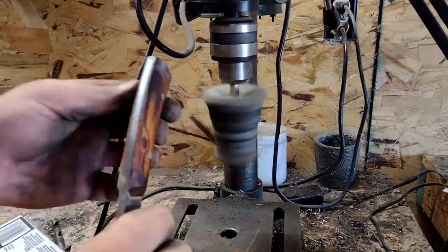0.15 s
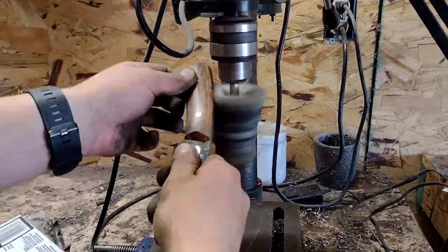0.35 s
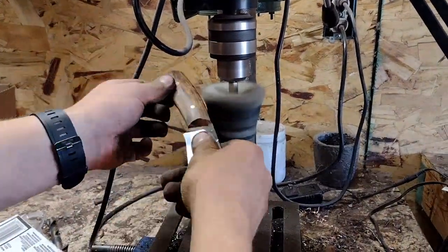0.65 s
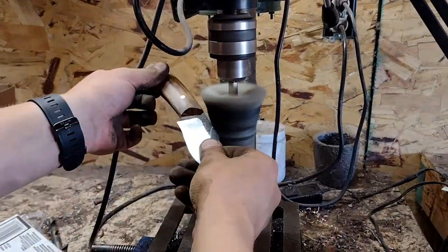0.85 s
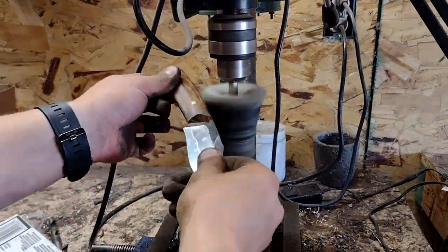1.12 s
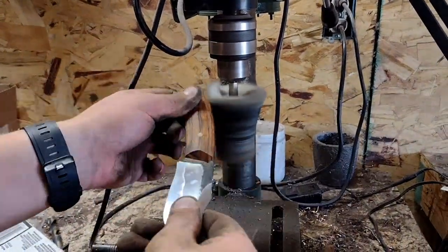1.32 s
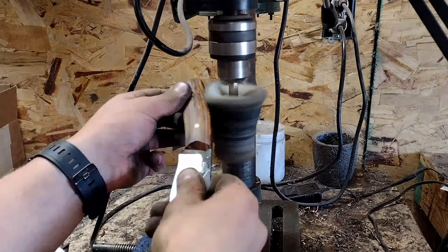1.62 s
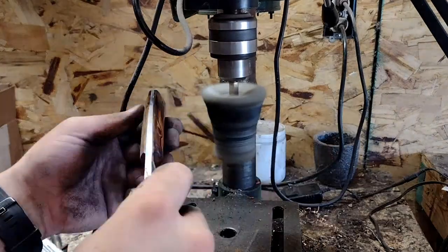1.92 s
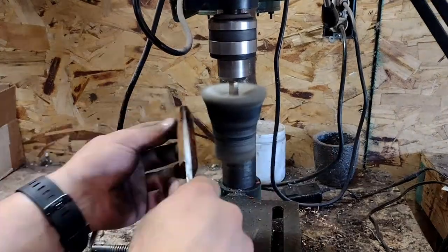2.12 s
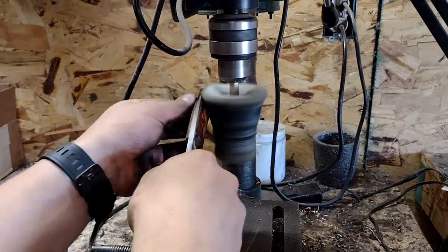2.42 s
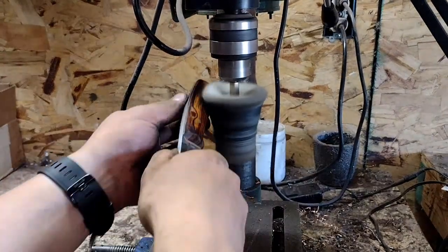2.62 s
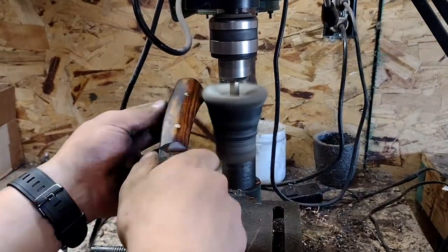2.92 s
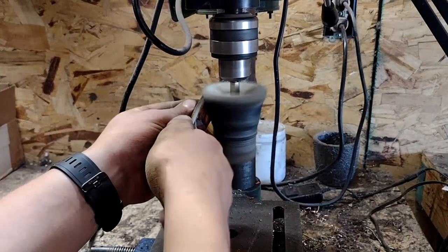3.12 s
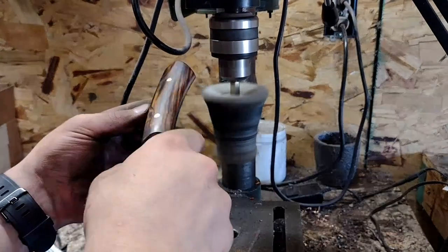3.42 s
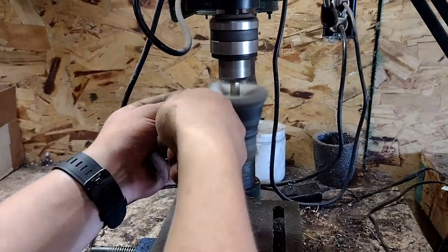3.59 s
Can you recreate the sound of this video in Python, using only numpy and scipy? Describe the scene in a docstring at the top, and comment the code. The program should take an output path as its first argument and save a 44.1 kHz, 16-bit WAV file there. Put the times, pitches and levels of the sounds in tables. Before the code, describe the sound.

A drill press spins a cloth buffing wheel with a steady low drone, whir, light rattle and scattered metallic knocks. A knife handle rasps against it from 0.13 to 0.3 seconds, then longer from 0.66, biting with a loud hiss and scratch near 1.05. Shorter fluttering strokes follow from 1.2, with tiny faint squeaks near 2.45 and 2.78. Close, small wooden workshop; abrupt silence at 3.7.

```python
"""A motor drone and a light metallic rattle come first: a drill press spins a cloth buffing wheel in a small
wooden workshop. Then a knife handle is pressed to the wheel in short strokes, rasping with a flutter, hissing
when it bites, scratching at times and twice squeaking briefly; all sound stops abruptly at the end.
Drone: filtered noise. Rattle and knocks: impacts ringing resonances. Strokes and scratches: random grains.
Squeaks: trains of stick-slip pulses."""
import sys
import numpy as np
from scipy import signal
from scipy.fft import rfft, irfft, next_fast_len
from scipy.io import wavfile
from scipy.ndimage import map_coordinates

SR = 44100
rng = np.random.default_rng(int(sys.argv[2]) if len(sys.argv) > 2 else 0)


def waveform_to_disk(signal):
    """Save audio, clipped to [-1, 1], as 16-bit WAV at the path in sys.argv[1]."""
    frames = np.transpose(np.atleast_2d(signal))
    scaled = np.clip(frames, -1, 1) * 32767
    samples = np.round(scaled).astype(np.int16)
    wavfile.write(sys.argv[1], SR, samples)


N = 165375  # samples

WHEEL_HZ = 42.98  # turns per second

# Spectrum of the rumble through the frame [f/Hz, level/dB]
FRAME_SPECTRUM = [(15, -40.5), (25, -15), (49, -3.5), (91, -6.5), (127, 0), (173, -4), (217, -3.5),
                  (285, -6), (343, -5.5), (424, 1), (558, -3), (620, -13), (690, -4.5), (768, -12.5),
                  (894, -18), (950, -25.5), (1240, -25.5), (2090, -120)]
# Resonances of the motor's hum [f/Hz, width/Hz, level/dB]
HUM_MODES = [(128.5, 13.55, -1.5), (226, 20, -12.5), (685, 19, -12)]
# Spectrum of the bearings' whir [f/Hz, level/dB]
WHIR_SPECTRUM = [(500, -41.5), (900, -11), (1060, 2.5), (1290, -8.5), (1540, 3), (1900, -5.5), (2250, -7),
                 (2630, -14.5), (3000, -19.5), (3800, -33.5), (4300, -27), (5000, -29.5), (8500, -37.5),
                 (15500, -54)]
FRAME_DB, HUM_DB, WHIR_DB = -53, -63, -61  # rms before the common waver

# Resonances of spindle and chuck [f/Hz, width/Hz, level/dB]
SPINDLE_MODES = [(1050, 80, -13), (1560, 190, -1), (1850, 230, 0), (2300, 300, -10), (3150, 250, -22),
                 (4280, 200, -18), (6400, 400, -28), (8600, 600, -34)]
# Spectrum of the rattle's soft contact [f/Hz, level/dB]
SOFT_CONTACT_SPECTRUM = [(2000, -1), (4300, -5), (7000, -14)]
RATTLE_DB, RATTLE_PER_S = -69, 160  # direct rms, impacts per second
# Sharp knocks of the spindle [t/s, level/dB before KNOCK_GAIN_DB]
KNOCKS = [(0.2682, -34), (0.717, -44), (0.8292, -29), (0.913, -35.5), (0.9363, -34), (0.9722, -31.5),
          (1.0114, -32), (1.1526, -37.5), (1.1847, -38.5), (1.2086, -41), (1.362, -35), (1.8237, -43),
          (1.879, -40), (1.9888, -40.5), (2.0157, -39), (2.2674, -38), (2.3141, -42), (2.6258, -40.5),
          (2.797, -38), (2.8257, -40.5), (2.9806, -45), (3.0152, -39), (3.2569, -40), (3.5385, -40.5),
          (3.68, -41.5)]
KNOCK_GAIN_DB, BURR_DECAY_S = 10, 0.0027
# Spells of thin metallic chatter [start t/s, end t/s, level/dB]
CHATTER_SPELLS = [(.22, 0.336, -81), (2.136, 2.362, -73.5), (2.776, 2.856, -77), (2.912, 3.06, -72.5)]
# Spectrum of the chatter [f/Hz, level/dB]
CHATTER_SPECTRUM = [(3300, -45), (3950, -17), (4180, -2), (4380, 0), (4580, -14), (5200, -45)]
CHATTER_DEPTH_DB = 5.5  # peak swing over a turn

# Strokes against the wheel, each a list of [t/s, rasp level/dB, hiss level/dB], before the trims below
STROKES = [
    [(0.13, -67, -99), (0.132, -61, -96), (0.208, -46, -62.5), (0.274, -45.5, -73.5), (0.286, -65, -84),
     (0.3, -50.5, -81)],
    [(0.66, -76, -101), (0.674, -59, -84), (0.782, -44.5, -59), (1.05, -41.5, -52.5), (1.07, -36, -46),
     (1.14, -49.5, -66)],
    [(1.23, -56, -79), (1.356, -53.5, -74.5), (1.362, -54.5, -68), (1.4, -56, -81), (1.452, -47.5, -63.5),
     (1.68, -60.5, -86)],
    [(1.885, -49, -74), (2.057, -44, -68), (2.107, -47, -68.5), (2.143, -46, -66), (2.167, -54, -76),
     (2.21, -51.5, -75)],
    [(2.24, -67, -80), (2.272, -53.5, -79), (2.304, -58, -80), (2.316, -49, -68), (2.37, -61.5, -87),
     (2.38, -72, -79)],
    [(2.51, -78, -95), (2.52, -58, -86), (2.578, -49, -67), (2.596, -65, -81), (2.604, -66, -80),
     (2.61, -76, -79)],
    [(2.71, -66, -91.5), (2.758, -52, -75), (2.788, -50, -58.5), (2.802, -43, -62.5), (2.816, -67, -87.5),
     (2.82, -68, -79)],
    [(2.89, -54, -83), (2.908, -78, -88), (2.922, -53, -81), (2.938, -49, -68.5), (2.994, -64, -87),
     (3.0, -63, -85)],
    [(3.16, -59, -117), (3.2, -57.5, -85), (3.21, -58, -75), (3.218, -53, -69.5), (3.23, -45, -76),
     (3.25, -71, -85)],
    [(3.3, -59.5, -87), (3.368, -49.5, -67), (3.47, -50, -65), (3.482, -41.5, -58), (3.506, -56.5, -84),
     (3.52, -58, -91)],
    [(3.675, -71, -90), (3.679, -56, -76), (3.695, -50.5, -79), (3.708, -53, -76)],
]
# Ringing of the handle in each stroke [level/dB over the rasp]
HANDLE_RING_DB = [-3, -10.5, -9, 3.5, -15, -4, -7.5, -6.5, -2, -3.5, -16]
# Resonances of the handle [f/Hz, width/Hz, level/dB]
HANDLE_MODES = [(1398, 95, 4.5), (1890, 160, 1), (2610, 27, -15.5), (3036, 41, -13), (3370, 90, -11.5),
                (4760, 80, -37), (6200, 110, -42), (6530, 110, -28.5)]
# Spectrum of the rasp [f/Hz, level/dB]
RASP_SPECTRUM = [(470, -41), (800, -11.5), (857, -11), (940, -15), (1030, 5), (1310, -8.5), (1440, 5),
                 (1620, -0.5), (1860, -3.5), (2050, -5), (2630, -8), (2830, -15), (3180, -11), (3490, -16),
                 (3790, -27.5), (4220, -17), (4420, -25), (4740, -28), (5000, -40), (6500, -45.5),
                 (11000, -120)]
# Spectrum of the hiss [f/Hz, level/dB]
HISS_SPECTRUM = [(2820, -49), (4800, -14), (4910, -25), (5070, -19), (5540, -5), (6340, 2.5), (6770, -5),
                 (6950, -8.5), (7320, -8), (8110, -2.5), (8630, -3), (9180, -7), (9610, -14),
                 (10500, -14.5), (13600, -47), (22000, -120)]
# Spectrum of the top sizzle [f/Hz, level/dB]
SIZZLE_SPECTRUM = [(5000, -32), (9500, -13), (11200, 0), (12100, 0), (13300, 3), (15600, -5.5)]
# Spectrum of the low thrum as a stroke loads the frame [f/Hz, level/dB]
THRUM_SPECTRUM = [(60, -18.5), (130, -3), (250, -3.5), (400, -6), (540, 2.5), (620, -10), (700, -16),
                  (900, -4.5), (1300, -46)]
RASP_TRIM_DB, HISS_TRIM_DB, THRUM_TRIM_DB = -2, -2.5, -10.5
# Sizzle level when the hiss curve is at FULL_BITE_DB, and the power of the hiss it follows
SIZZLE_DB, FULL_BITE_DB, SIZZLE_EXPONENT = -69.5, -57, 0.96
FLUTTER_DB = 2  # peak swing over a turn
FIBRES_PER_S, GRIT_PER_S = 5000, 2800  # mean impacts per second

# Scratches where an edge catches the wheel [t/s, length/s, peak level/dB]
SCRATCHES = [(1.028, .085, -43), (2.33, 0.014, -60), (2.57, 0.024, -72), (2.801, .016, -66),
             (3.212, 0.017, -65), (3.466, .03, -62)]
# Spectrum of the scratches [f/Hz, level/dB]
SCRATCH_SPECTRUM = [(500, -17), (2000, 9), (5500, 1.5), (8500, -7.5), (11000, -6.5), (14500, -3),
                    (16000, 8)]

# Squeaks [t/s, length/s, slip rate f/Hz, level/dB]
SQUEAKS = [(2.451, 0.014, 1010, -65), (2.783, 0.014, 990, -68)]
# Spectrum of a slip [f/Hz, level/dB]
SQUEAK_SPECTRUM = [(1000, -12), (2800, -10), (4200, -10), (5100, -14), (6000, -5), (7000, -1), (8000, -5),
                   (9200, -4), (10100, 1), (11200, -12), (13200, -11), (16000, -15)]

# Time for the late answer to fall 60 dB [f/Hz, time/s]; where negative, it grows instead
DECAY_TIME = [(200, .2), (2000, 1.4), (12000, -0.5)]
# Reflected or side-specific share [f/Hz, level/dB over the direct or shared part]
WET_SHARE = [(60, -20), (150, -18), (320, -14), (550, -4.5), (1200, -1), (3000, 1), (9000, 3)]
# Left side over right [f/Hz, level/dB]
BALANCE = [(60, -0.5), (250, 1.5), (480, 1), (600, 1), (700, 6.5), (850, 6), (1150, -4), (1500, 1),
           (1900, -1), (2350, 4), (2800, -1), (4150, -1), (5400, 0.5), (5850, 1), (7000, 2), (9500, 1),
           (15000, 1)]
STOP_S, STOP_FADE_S = 3.711, 0.0026  # moment of silence, and the fade before it
TOP_HZ = 15750  # band limit


def amp(db):
    """Decibels to amplitude ratio."""
    return 10 ** (np.asarray(db) / 20)


def unit(x):
    """Scaling to rms 1."""
    return x / np.sqrt(np.mean(x ** 2) + 1e-20)


def clock():
    """The time of each sample in seconds."""
    return np.arange(N) / SR


def along(points, hz):
    """Interpolation of (Hz, value) points on a logarithmic frequency axis."""
    f, value = np.transpose(points)
    return np.interp(np.log(hz + 1), np.log(f + 1), value)


def wobble(rate):
    """Slow random modulation: a smooth curve through `rate` random knots a second."""
    knots = rng.standard_normal(int(N * rate / SR) + 4)
    return map_coordinates(knots, [clock() * rate])


def spell(start, end, edge_s):
    """A gate with linear edges."""
    t = clock()
    return np.clip(np.minimum(t - start, end - t) / edge_s, 0, 1)


def filtered(x, response):
    """Linear filtering: the spectrum times a response of frequency."""
    m = 2 * next_fast_len(N // 2 + SR // 4)
    hz = np.fft.rfftfreq(m, 1 / SR)
    return irfft(rfft(x, m) * response(hz), m)[..., :N]


def coloured(x, points):
    """Minimum-phase filtering: the cepstrum is folded so that the filter is causal."""
    def response(hz):
        cepstrum = irfft(np.log(amp(along(points, hz)) + 1e-6))
        half = len(cepstrum) // 2
        cepstrum[1:half] *= 2
        cepstrum[half + 1:] = 0
        return np.exp(rfft(cepstrum))
    return filtered(x, response)


def rung(x, modes):
    """Modal resonance: parallel second-order band-passes of alternating sign."""
    def response(f):
        total = 0
        for k, (centre, width, db) in enumerate(modes):
            damping = 1j * f * width
            total = total + (-1) ** k * amp(db) * damping / (centre * centre - f * f + damping)
        return total
    return filtered(x, response)


def grains(rate, spread_db):
    """Random impacts: `rate` per second on average, of uneven size and either sign."""
    size = amp(spread_db * np.clip(rng.standard_normal(N), -2, 2))
    return (rng.random(N) < rate / SR) * size * np.sign(rng.standard_normal(N))


def workshop(x, early_s=0.0044, late_db=-5):
    """Reflection by convolution, different on each side: dense early noise, then a late answer.

    Negative decay times make the late noise swell, chiefly in a narrow band near 7.6 kHz."""
    hz, t, noise = signal.stft(rng.standard_normal((2, SR // 4)), SR, nperseg=256)
    envelope = amp(-60 * t / along(DECAY_TIME, hz)[:, None])
    late = signal.istft(noise * envelope, SR, nperseg=256)[1]
    age = np.arange(late.shape[1]) / SR
    early = rng.standard_normal(late.shape) * age * np.exp(-age / early_s)
    answer = unit(unit(early) + amp(late_db) * unit(late)) / np.sqrt(len(age))
    wet = signal.fftconvolve(x[None], answer, axes=1)[:, :N]
    return x + filtered(wet, lambda f: amp(along(WET_SHARE, f)))


def spread(make):
    """Partial coherence: one part shared by both sides plus one of each side's own, at rms 1."""
    shared = make()
    own = np.array([make(), make()])
    return unit(shared + filtered(own, lambda f: amp(along(WET_SHARE, f))))


def drone(waver_db=0.74):
    """Steady machine noise: motor and belt rumble and hum through the frame; the bearings whir."""
    frame = spread(lambda: coloured(rng.standard_normal(N), FRAME_SPECTRUM))
    hum = spread(lambda: rung(rng.standard_normal(N), HUM_MODES))
    whir = spread(lambda: coloured(rng.standard_normal(N), WHIR_SPECTRUM))
    steady = amp(FRAME_DB) * frame + amp(HUM_DB) * hum + amp(WHIR_DB) * whir
    return amp(waver_db * wobble(14)) * steady


def light_rattle():
    """Impact excitation: play in the spindle gives soft random contacts that ring its modes."""
    contacts = coloured(grains(RATTLE_PER_S, spread_db=3), SOFT_CONTACT_SPECTRUM)
    return amp(RATTLE_DB) * unit(rung(contacts, SPINDLE_MODES))


def thin_chatter():
    """Periodic modulation: metallic noise swells about once a turn, within separate spells."""
    level = sum(amp(db) * spell(start, end, edge_s=0.0099) for start, end, db in CHATTER_SPELLS)
    turn = np.sin(2 * np.pi * WHEEL_HZ * clock() + wobble(20))
    swell = amp(CHATTER_DEPTH_DB * turn + 2 * wobble(90))
    return level * unit(swell * coloured(rng.standard_normal(N), CHATTER_SPECTRUM))


def spindle_knocks(burr=.1):
    """Impulse response: each blow, an impulse with a short noisy burr, rings the spindle's modes."""
    blows = np.zeros(N)
    age = clock()[:SR // 50]
    for s, db in KNOCKS:
        contact = burr * rng.standard_normal(len(age)) * np.exp(-age / BURR_DECAY_S)
        contact[0] = 1
        blows[round(s * SR):][:len(age)] += amp(db + KNOCK_GAIN_DB) * contact
    # a lone unit impulse would ring with energy 1
    return rung(blows, SPINDLE_MODES) / np.linalg.norm(rung(np.ones(1), SPINDLE_MODES))


def spindle():
    """Play in the spindle, radiated: rattle and chatter, and knocks with shorter reflections."""
    steady = workshop(light_rattle() + thin_chatter())
    return steady + workshop(spindle_knocks(), early_s=0.0028, late_db=-12)


def rubbing(rough_db=2.0, edge_db_per_s=900):
    """Friction as many impacts: fibres strike the handle, harder once a turn, and load the frame."""
    t = clock()
    rasp, hiss, ring = np.zeros((3, N))
    for stroke, ring_db in zip(STROKES, HANDLE_RING_DB):
        s, rasp_db, hiss_db = np.transpose(stroke)
        outside_db = edge_db_per_s * abs(t - np.clip(t, s[0], s[-1]))
        # rasp and ring share the stroke's power
        level = amp(np.interp(t, s, rasp_db) - outside_db) / np.hypot(1, amp(ring_db))
        rasp += level
        ring += level * amp(ring_db)
        hiss += amp(np.interp(t, s, hiss_db) - outside_db)

    turn = np.sin(2 * np.pi * WHEEL_HZ * t + .5 * wobble(4.7))
    flutter = unit(amp(FLUTTER_DB * turn + rough_db * wobble(300)))

    wood = rasp * spread(lambda: coloured(grains(FIBRES_PER_S, spread_db=4.5), RASP_SPECTRUM))
    wood = wood + ring * spread(lambda: rung(grains(FIBRES_PER_S, spread_db=5.5), HANDLE_MODES))
    fibres = hiss * spread(lambda: coloured(grains(GRIT_PER_S, spread_db=3.5), HISS_SPECTRUM))
    bite = (hiss / amp(FULL_BITE_DB)) ** SIZZLE_EXPONENT
    sizzle = bite * spread(lambda: coloured(grains(GRIT_PER_S, spread_db=6), SIZZLE_SPECTRUM))
    thrum = rasp * spread(lambda: coloured(rng.standard_normal(N), THRUM_SPECTRUM))

    low = amp(RASP_TRIM_DB) * wood + amp(THRUM_TRIM_DB) * thrum
    high = amp(HISS_TRIM_DB) * fibres + amp(SIZZLE_DB) * sizzle
    return flutter * (low + high)


def scratches():
    """Granular friction: an edge catches the wheel; a spray of coarse grains swells and dies."""
    t = clock()
    level = np.zeros(N)
    for s, length, db in SCRATCHES:
        level += amp(db) * np.sin(np.pi * np.clip((t - s) / length, 0, 1))
    return level * spread(lambda: coloured(grains(2000, spread_db=6.5), SCRATCH_SPECTRUM))


def squeaks(jitter_s=.000011, uneven_db=3.5):
    """Stick-slip: the handle slips in a near-periodic pulse train that grows, then breaks off."""
    slips = np.zeros(N)
    taps = np.arange(-8, 9)
    for s, length, hz, db in SQUEAKS:
        age = np.arange(0, length, 1 / hz)
        chance = rng.standard_normal((64, 2))[:len(age)]
        at = (s + age + jitter_s * chance[:, 0]) * SR
        growth = np.sqrt(age / length * SR / hz)
        size = amp(db + uneven_db * chance[:, 1]) * growth
        # sinc pulses place the slips between samples
        index = at.astype(int)[:, None] + taps
        pulses = size[:, None] * np.sinc(index - at[:, None])
        slips += np.bincount(index.ravel(), pulses.ravel(), N)
    slip_norm = np.linalg.norm(coloured(np.ones(1), SQUEAK_SPECTRUM))
    return workshop(coloured(slips, SQUEAK_SPECTRUM) / slip_norm, early_s=0.00061, late_db=-20)


def scene():
    """Superposition of machine and handwork, close by, with a left-right balance over frequency."""
    total = drone() + spindle() + rubbing() + scratches() + squeaks()
    sides = np.array([[.5], [-.5]])  # left gains half the difference, right loses half
    return filtered(total, lambda hz: amp(along(BALANCE, hz) * sides))


def record(dry):
    """Truncation and band limiting: the sound stops abruptly; nothing is kept above TOP_HZ."""
    gate = np.clip((STOP_S - clock()) / STOP_FADE_S, 0, 1)
    return filtered(dry * gate, lambda hz: hz < TOP_HZ)


dry = scene()
out = record(dry)
waveform_to_disk(out)
```